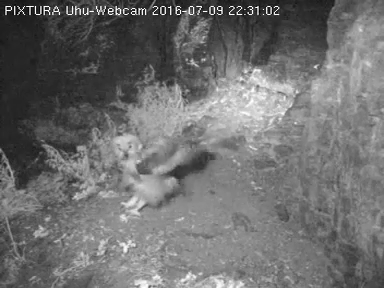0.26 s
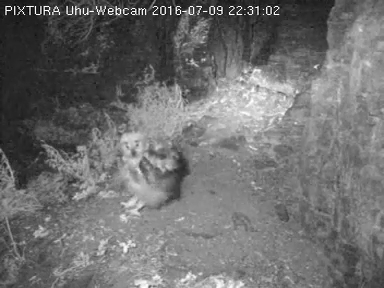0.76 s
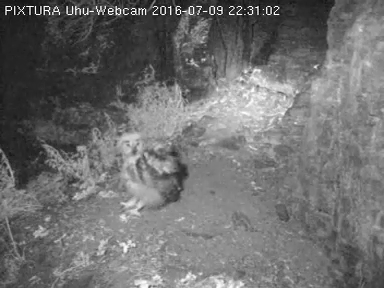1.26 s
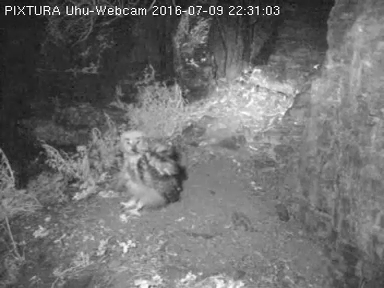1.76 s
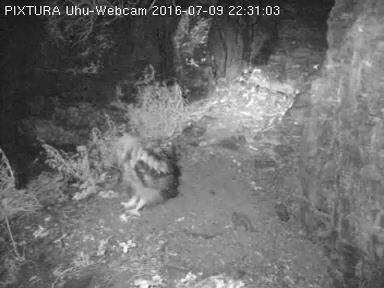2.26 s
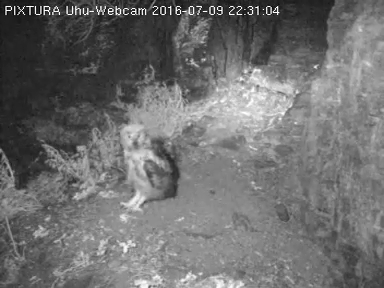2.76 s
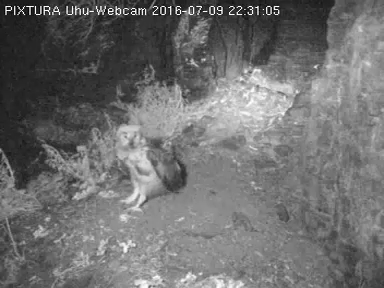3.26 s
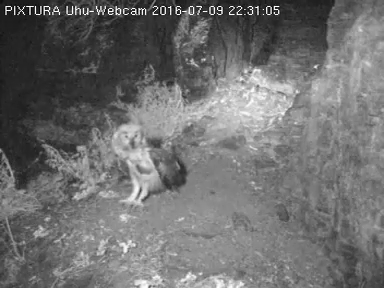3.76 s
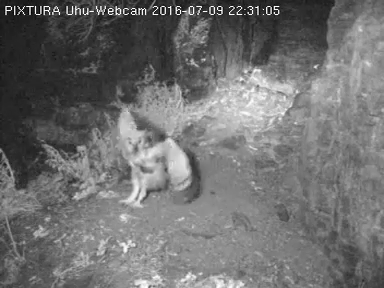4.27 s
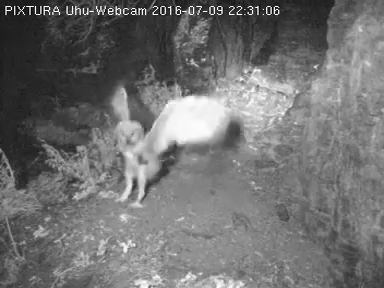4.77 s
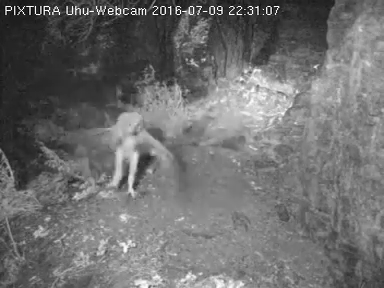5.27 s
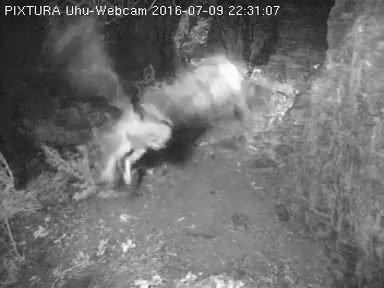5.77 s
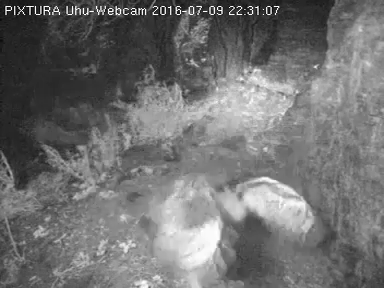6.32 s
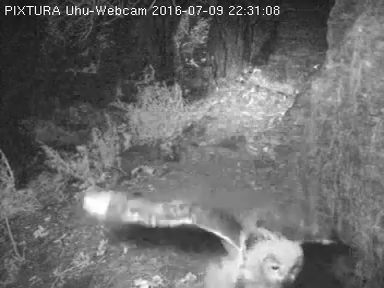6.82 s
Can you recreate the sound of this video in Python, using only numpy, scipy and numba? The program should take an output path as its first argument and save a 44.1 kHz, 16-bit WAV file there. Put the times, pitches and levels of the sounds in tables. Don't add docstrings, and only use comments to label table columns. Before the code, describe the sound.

A steady low mains hum, boxy rumble and soft amplifier hiss fill a quiet night outdoors throughout. At about 1.2 seconds a young owl gives a weak, hoarse hiss, about a third of a second long, swelling and then closing with a little falling squeak. From 2.0 to 2.45 seconds its feathers shake: a rapid, soft rustling flutter with dull flaps, with a sharper stroke near 2.2. A firmer, brighter rasp comes at 2.9 to 3.2 seconds, then a strong one at 4.3 to 4.65, its squeak dropping lowest. The rumble stirs briefly around these moments and near 4.85. After a pause of only background, the strongest scratchy hiss arrives at 6.2 to 6.55 seconds, over a longer low gust. Nearby rock adds a faint slap and very short tail. A last puff of rumble comes near 6.95.

```python
import sys
import numpy as np
from scipy import signal
from scipy.fft import rfft, irfft
from scipy.io import wavfile
from scipy.ndimage import uniform_filter1d
from numba import njit

SR = 44100
rng = np.random.default_rng(int(sys.argv[2]) if len(sys.argv) > 2 else 0)


def attenuation_scalar(level_db):
    decades = np.asarray(level_db, float) / 20
    return 10 ** decades


def store_wav(level_fs):
    pcm = np.round(np.clip(np.atleast_2d(level_fs), -1, 1) * 32767)
    wavfile.write(sys.argv[1], SR, pcm.T.astype(np.int16))


N = 310905
T = np.arange(N) / SR

# (start [s], full effort [s], chest surge [s], effort [dB], windpipe [dB])
CALLS = [
    (1.162, 1.341, 1.315, -46, -54.5),
    (2.867, 2.99, 3.01, -43, -52.5),
    (4.299, 4.439, 4.47, -40.5, -52.5),
    (6.211, 6.349, 6.365, -40, -52),
]
BEAK_SHUT = np.array([1.484, 3.21, 4.659, 6.551])
# (open [Hz], width [Hz], surge [dB], shut [Hz], squeak [dB])
GAPES = [
    (2370, 290, -43.5, 1920, -44.5),
    (2275, 540, -41.5, 1600, -46),
    (2300, 380, -43, 1400, -45.5),
    (2290, 320, -47, 1500, -46),
]
# (palate [Hz], palate [dB], palate width [Hz], breath [dB], treble [dB])
POSES = [
    (3325, -5, 160, -2, -12),
    (3133, -3.5, 150, -2.5, -1.5),
    (3080, -2.5, 320, -4.5, -2),
    (3264, -1.5, 260, -5.5, -3),
]
# (centre [Hz], width [Hz], level over effort [dB])
BEAK_MODES = [
    [(600, 200, -20), (1480, 130, -9), (3800, 200, -5), (4300, 400, -13), (5000, 600, -16)],
    [(600, 200, -24), (1500, 300, -18), (3950, 300, -5), (4400, 400, -7), (5300, 600, -16)],
    [(670, 150, -26), (1550, 300, -19), (3700, 300, -5), (4200, 400, -6), (5300, 800, -18)],
    [(665, 60, -21), (1550, 250, -15), (3800, 300, -9), (4280, 300, -9), (5200, 800, -19)],
]
# (frequency [Hz], density [dB per Hz])
BREATH_SPECTRUM = [(180, -64), (300, -24), (842, -15), (954, -7.5), (1180, -8), (3250, 2.5), (6630, -17.5),
                   (8400, -16.5), (10900, -60), (18500, -120)]
# (frequency [Hz], density [dB per Hz])
TREBLE_SPECTRUM = [(10200, -47), (10400, -5.5), (11200, 4.5), (12400, 2), (12700, -30)]
# (frequency [Hz], density [dB per Hz])
EDGE_SPECTRUM = [(8200, -37), (8300, -16.5), (8850, 6), (9400, -9), (10300, -3.5), (10500, -30)]
# (time [s], peak [dB], thump over peak [dB], length [s])
FEATHER_STROKES = [(1.996, -44.5, -4.5, 0.017), (2.014, -52, -9, 0.013), (2.036, -50.5, -2.5, 0.022),
                   (2.06, -50, -8, 0.026), (2.093, -50, -2.5, 0.054), (2.114, -47.5, -0.5, 0.027),
                   (2.138, -52, -6, 0.022), (2.168, -49.5, -5, 0.026), (2.216, -38, -6.5, 0.014),
                   (2.356, -42, -6.5, 0.033), (2.43, -46, -13, 0.018)]
# (time [s], level over rumble [dB], length [s])
GUSTS = [
    (1.247, -2.5, .15),
    (2.5, -3.5, 0.2),
    (3.455, -0.5, .12),
    (3.676, 3, 0.035),
    (4.293, 5, 0.04),
    (4.854, 4, 0.12),
    (6.5, 4.5, 0.34),
    (6.954, 3.5, 0.11),
]
# (frequency [Hz], density [dB per Hz])
RUMBLE_SPECTRUM = [(12, -69.5), (20, -39.5), (25, -30), (38, -12.5), (92, -4), (118, -10.5), (135, -8),
                   (156, -0.5), (190, 0), (227, -16), (258, -19.5), (280, -27.5), (330, -26), (430, -53.5),
                   (730, -120)]
# (frequency [Hz], density [dB per Hz])
HISS_SPECTRUM = [(140, -30), (230, 0), (260, -3), (280, -7), (341, -5), (403, -0.5), (597, -5.5),
                 (644, -5.5), (956, -5.5), (2200, -11), (6850, -14.5), (7970, -18), (8600, -39.5),
                 (11200, -64.5), (18900, -120)]
# (frequency [Hz], rms level [dB])
MAINS_HARMONICS = [(50, -66), (150, -59), (250, -83), (350, -83.5), (650, -76.5)]
# (centre [Hz], least level heard [dB], scatter [dB])
FAINT_BANDS = [(8613, -90, .8), (9302, -91.5, .7), (9991, -92.5, 1), (10680, -87, 3), (11369, -88, 4),
               (12058, -88, 4), (12600, -92, 3)]

SWELL_DB, SWELL_CURVE = 32.5, 1.29
RELEASE_S, RELEASE_DB, RELEASE_CURVE = 0.092, 21.5, 1.96
CLOSING_S = 0.037
GAPE_HZ_PER_DB, PALATE_HZ_PER_DB = 4.5, 10
PALATE_CLIMB_HZ_S = 695
GAPE_RISE_DB_S, GAPE_FALL_DB_S = 198, 124
SQUEAK_RISE_DB_S, SQUEAK_FALL_DB_S, SQUEAK_LEAD_S = 168, 246, 0.026
PIPE_RISE_DB_S, PIPE_FALL_DB_S = 63, 70
SURGE_DB, SURGE_S = 5.5, 0.027
EDGE_DB, EDGE_SLOPE, EDGE_RELEASE = -19.5, 1.1, 0.75
RUMBLE_DB, HISS_DB = -57, -59.5
SPLIT_SHARE, SPLIT_DB = 0.09, -12.5


def unit(x):
    return x / np.sqrt(np.mean(x ** 2))


def coloured(points):
    hz, db = np.transpose(points)
    log_hz = np.log(np.maximum(np.fft.rfftfreq(N, 1 / SR), 1))
    gain = attenuation_scalar(np.interp(log_hz, np.log(hz), db, -120, -120))
    return unit(irfft(rfft(rng.standard_normal(N)) * gain, N))


def walk(rate):
    k = int(SR / rate)
    held = np.repeat(rng.standard_normal(N // k + 1), k)
    return unit(uniform_filter1d(uniform_filter1d(held, k), k)[:N])


def tent(at, rise, fall):
    return -rise * np.maximum(at - T, 0) - fall * np.maximum(T - at, 0)


@njit
def svf(x, hz, width):
    y, b, l = np.empty(len(x)), 0., 0.
    for i in range(len(x)):
        g, k = np.tan(np.pi * hz[i] / SR), width[i] / hz[i]
        v = (b + g * (x[i] - l)) / (1 + g * (g + k))
        b, l, y[i] = 2 * v - b, l + 2 * g * v, k * v
    return y


def ring(x, hz, width):
    hz, width = hz + 0 * T, width + 0 * T
    return svf(svf(x, hz, width), hz, width) * np.sqrt(SR / width / 2.07)


def locked(x, share):
    return x / (uniform_filter1d(x ** 2, size=700) + 0.05) ** (share / 2)


def owlet():
    shut_times = np.array(BEAK_SHUT)
    call = np.minimum(np.searchsorted(shut_times + 0.5, T), len(CALLS) - 1)
    begin, full, surge, peak_db, windpipe_db = np.transpose(CALLS)[:, call]
    open_hz, gape_width, surge_db, last_hz, squeak_db = np.transpose(GAPES)[:, call]
    palate_hz, palate_db, palate_width, breath_db, treble_db = np.transpose(POSES)[:, call]
    shut = shut_times[call]
    start = shut - CLOSING_S

    swell_db = SWELL_DB * np.clip((full - T) / (full - begin), 0, 2) ** SWELL_CURVE
    release_db = RELEASE_DB * np.clip((T - shut) / RELEASE_S + 1, 0, 2) ** RELEASE_CURVE
    under_db = swell_db + release_db
    effort_db = peak_db - under_db
    edge_db = peak_db + EDGE_DB - EDGE_SLOPE * swell_db - EDGE_RELEASE * release_db
    surge_gape_db = surge_db + tent(surge, GAPE_RISE_DB_S, GAPE_FALL_DB_S)
    squeak_gape_db = squeak_db + tent(shut - SQUEAK_LEAD_S, SQUEAK_RISE_DB_S, SQUEAK_FALL_DB_S)
    gape_db = np.maximum(surge_gape_db, squeak_gape_db)
    push_db = SURGE_DB * np.exp(-((T - surge) / SURGE_S) ** 2)
    pipe_db = windpipe_db + tent(surge, PIPE_RISE_DB_S, PIPE_FALL_DB_S) + push_db
    onset = uniform_filter1d((T > begin) * 1., size=900)
    sounding = onset * np.exp(-np.maximum(T - shut, 0) / 0.0063) * (T > begin - 0.1)

    air = unit(attenuation_scalar(1.2 * walk(500)) * rng.standard_normal(N))

    closing = np.clip((T - start) / (shut - start), 0, 1)
    narrow = np.clip((T - start + 0.02) / 0.025, 0, 1)
    gape_hz = open_hz - GAPE_HZ_PER_DB * swell_db
    gape_hz = gape_hz + (last_hz - gape_hz) * closing ** 1.8
    gape = ring(air, gape_hz, gape_width + (240 - gape_width) * narrow)

    climb_hz = PALATE_CLIMB_HZ_S * np.clip(T - full, 0, 0.2)
    palate_hz = palate_hz - PALATE_HZ_PER_DB * under_db + climb_hz
    palate = attenuation_scalar(palate_db) * locked(ring(air, palate_hz, palate_width), 0.75)

    faint = np.clip((-50 - effort_db) / 20, 0, 1) * (T < start)
    line = locked(ring(air, 962 - 70 * faint, 55 + 130 * faint), 0.6)
    pipe = attenuation_scalar(-1) * line + attenuation_scalar(-3.5) * ring(air, 970.0, 1000.0)

    beak = np.zeros(N)
    for hz, width, db in np.transpose(BEAK_MODES, (1, 2, 0)):
        beak += attenuation_scalar(db[call] + 1.5 * walk(20)) * ring(air, hz[call], width[call])
    breath = attenuation_scalar(breath_db + 9.5 * faint) * coloured(BREATH_SPECTRUM)
    treble = attenuation_scalar(treble_db - 26.5) * coloured(TREBLE_SPECTRUM)
    voice = attenuation_scalar(effort_db) * (palate + beak + breath + treble)
    edge = attenuation_scalar(edge_db) * coloured(EDGE_SPECTRUM)
    return sounding * (voice - attenuation_scalar(gape_db) * locked(gape, 0.28) + attenuation_scalar(pipe_db) * pipe + edge)


def feathers():
    rustle, flap = np.zeros(N), np.zeros(N)
    for s, db, thump_db, length in FEATHER_STROKES:
        age = np.maximum(T - s, 0) / max(length, 0.003)
        shape = attenuation_scalar(db) * np.minimum(age * 7, 1) * np.exp(-age ** 2)
        rustle += shape
        flap += shape * attenuation_scalar(thump_db)
    grit = attenuation_scalar(2.5 * walk(900))
    quills = coloured([(600, 3.5), (1000, 1.5), (2500, 0.5), (4000, -13.5), (5000, -11.5), (9000, -22)])
    air = coloured([(50, 1), (100, 3.5), (250, -4.5), (450, 0.5), (800, -16), (1200, -17)])
    recess = attenuation_scalar(-15) * ring(flap * rng.standard_normal(N), 402., 60.)
    return attenuation_scalar(-11) * rustle * unit(grit * quills) + attenuation_scalar(-2.0) * flap * air + recess


def reflections(bird):
    slap = attenuation_scalar(-13) * np.roll(bird, 520)
    lag = T[:SR // 6]
    decay = np.exp(-np.log(1000) * lag / 0.22)
    scatter = rng.standard_normal(len(lag)) * (lag > 0.012) * decay
    tail = attenuation_scalar(-12) * signal.fftconvolve(bird, scatter / np.linalg.norm(scatter))[:N]
    return slap + tail


def night():
    gust_db = sum(db * np.exp(-((T - s) / length) ** 2) for s, db, length in GUSTS)
    rumble = attenuation_scalar(RUMBLE_DB + gust_db) * coloured(RUMBLE_SPECTRUM)
    hiss = attenuation_scalar(HISS_DB + 0.2 * walk(3.4)) * coloured(HISS_SPECTRUM)
    thin = attenuation_scalar(-73) * coloured([(8200, -30), (8300, 0), (10300, -3), (12600, -6), (12700, -30)])
    return rumble + hiss + thin


def hum():
    total = np.zeros(N)
    for hz, db in MAINS_HARMONICS:
        phase = rng.uniform(0, 2 * np.pi)
        total += attenuation_scalar(db + 2.0 + 0.42 * walk(5.2)) * np.sin(2 * np.pi * hz * T + phase)
    return total


def scene():
    bird = owlet() + feathers()
    mono = bird + reflections(bird) + night() + hum()
    return np.array([mono, mono])


def low_pass(x):
    return signal.sosfilt(signal.butter(12, 12700, fs=SR, output="sos"), x)


def record(dry):
    hz, _, z = signal.stft(dry[0], SR, nperseg=2048, noverlap=1024)
    for centre, least_db, scatter_db in FAINT_BANDS:
        band = np.abs(hz - centre) < 345
        power = np.mean(np.abs(z[band]) ** 2, axis=0)
        scatter = np.clip(rng.standard_normal(len(power)), -1.6, 3)
        z[band] *= power > attenuation_scalar(least_db + scatter_db * scatter) ** 2

    low_bands = 9 * np.log2(1 + np.minimum(hz, 3400) / 1700)
    band = (low_bands + np.maximum(hz - 3400, 0) / 689).astype(int)
    share = SPLIT_SHARE * np.interp(hz, [0, 2200, 2600, 8300, 9000], [0.03, 0.03, 0.6, 1, 1])[:, None]
    split = rng.random((band.max() + 1, z.shape[1]))[band] < share
    turned = np.abs(z) * np.exp(2j * np.pi * rng.random(z.shape))
    difference = attenuation_scalar(SPLIT_DB) * split * (hz > 250)[:, None] * turned
    mono = signal.istft(z, SR, nperseg=2048, noverlap=1024)[1][:N]
    side = signal.istft(difference, SR, nperseg=2048, noverlap=1024)[1][:N]
    return low_pass(np.array([mono + side, mono - side]))


dry = scene()
out = record(dry)
store_wav(out)
```